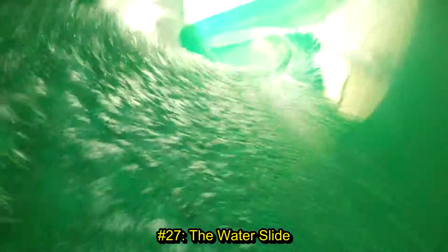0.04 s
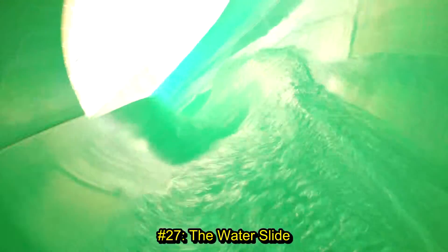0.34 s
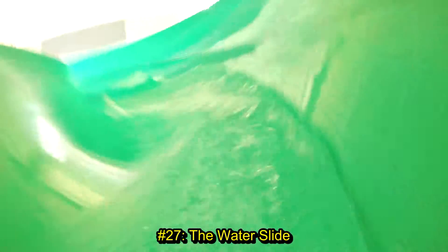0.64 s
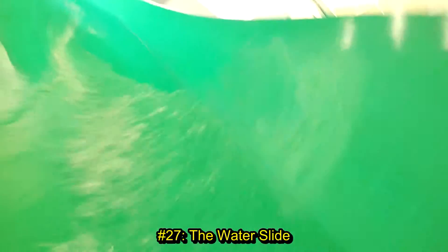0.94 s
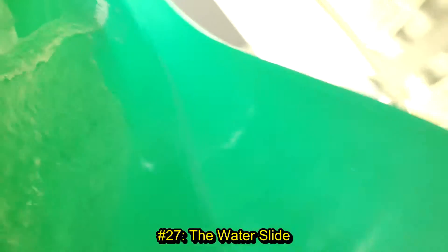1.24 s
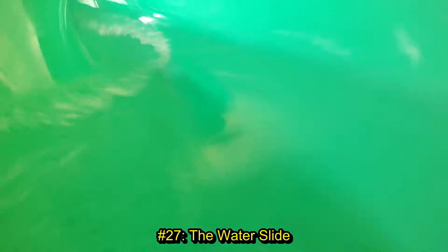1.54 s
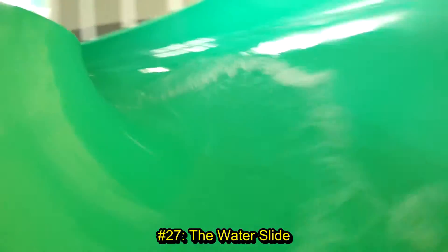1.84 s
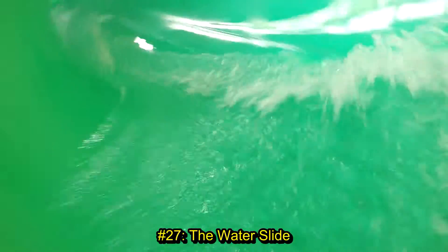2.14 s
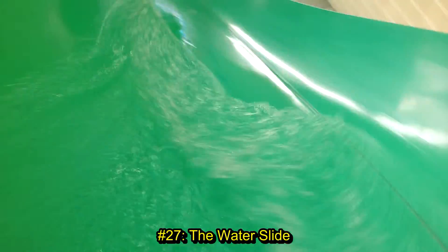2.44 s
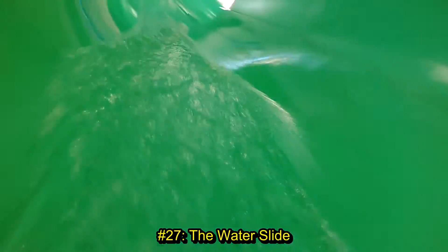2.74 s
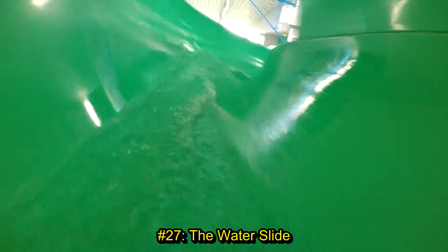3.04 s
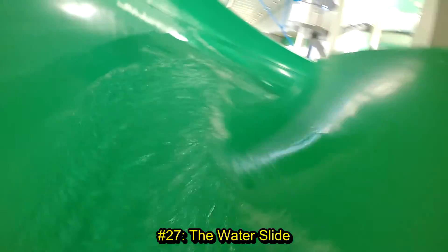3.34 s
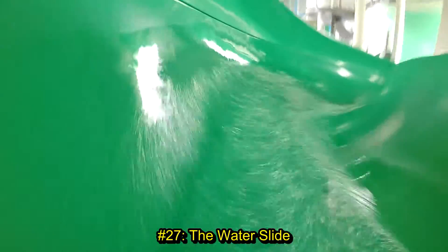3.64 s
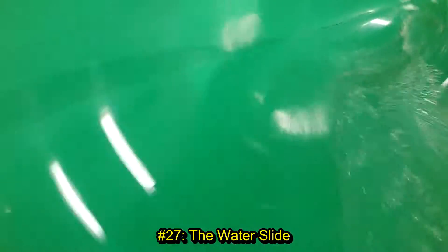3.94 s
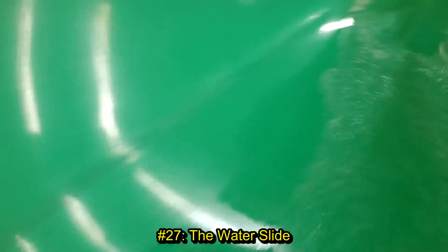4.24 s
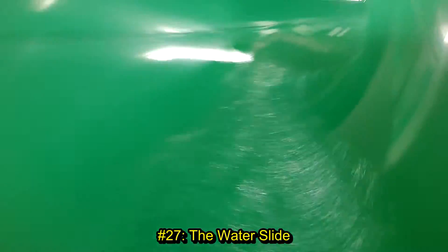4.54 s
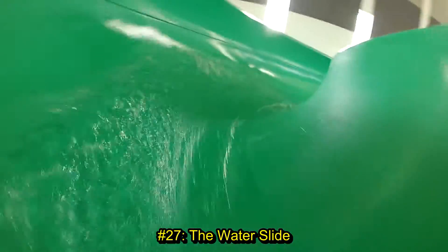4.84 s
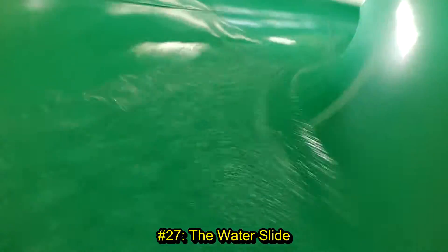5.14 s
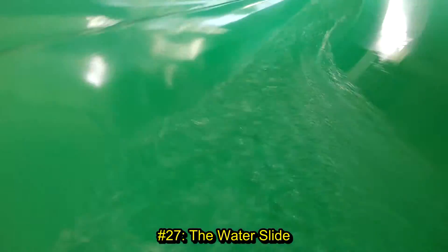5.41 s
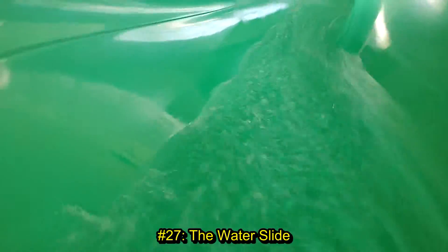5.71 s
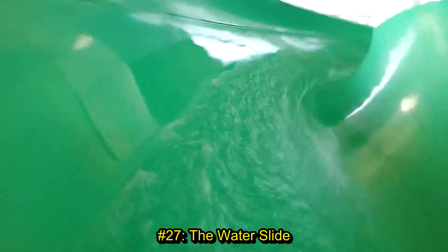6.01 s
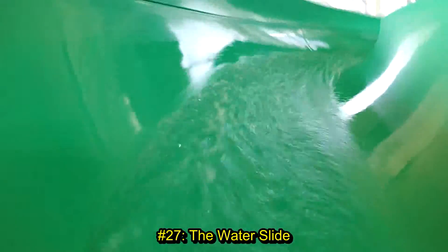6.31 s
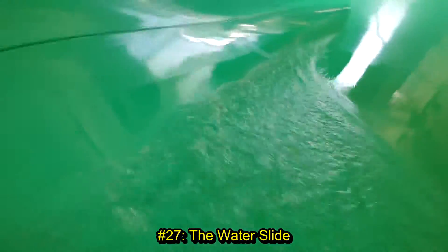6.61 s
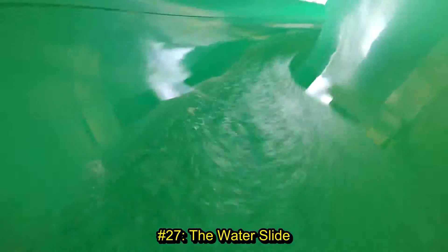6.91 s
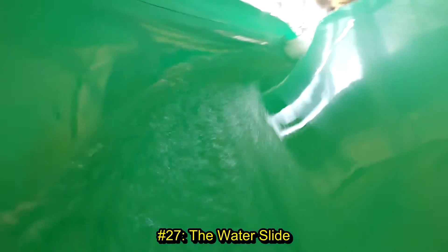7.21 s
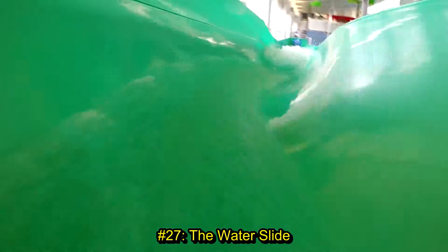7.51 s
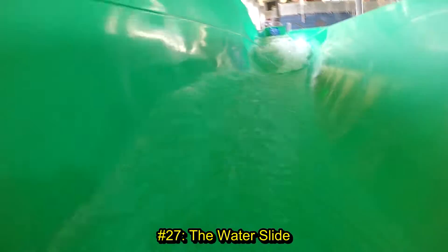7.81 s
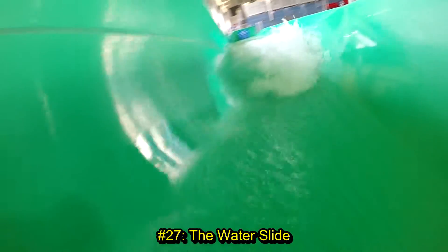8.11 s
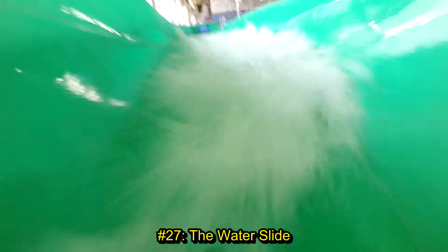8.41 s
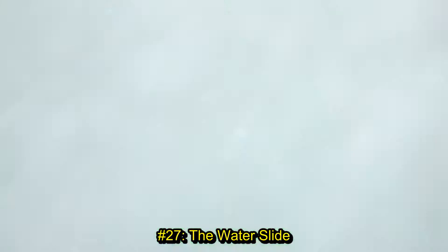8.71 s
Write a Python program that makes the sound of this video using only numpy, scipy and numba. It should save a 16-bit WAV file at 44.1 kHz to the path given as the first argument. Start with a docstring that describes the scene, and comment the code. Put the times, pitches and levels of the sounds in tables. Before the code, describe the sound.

Water rushes and bubbles along a hollow plastic water slide, heard from a camera riding just above the stream. It starts loud, then settles lower, with surges of spray, ticking drops and small plops. Gusts of air rumble on the microphone and dull thumps mark the joints in the slide. Near the end a deep roar builds, and a wave breaks over the microphone with sizzling foam, hard slaps and booms.

```python
"""A ride down a plastic water slide, heard from a camera held just above the running water.
From the top, bubbles ring in the curved flume over a low roar, and air buffets the microphone.
On the way down the rider thumps over joints, surges throw spray and drops at the camera, and big
bubbles plop. Then the run-out roars closer, until its wave breaks over the microphone
in sizzling foam, hard slaps and deep booms."""
import sys
import numpy as np
from scipy import signal
from scipy.fft import rfft, irfft
from scipy.io import wavfile
from scipy.ndimage import uniform_filter1d
from numba import njit

SR = 44100
rng = np.random.default_rng(int(sys.argv[2]) if len(sys.argv) > 2 else 0)


def wav_out(sig):
    """Save sig, one row per channel (or a flat mono array), as 16-bit PCM at SR to the path in sys.argv[1]."""
    wavfile.write(sys.argv[1], SR, np.round(np.clip(np.atleast_2d(sig).T, -1, 1) * 32767).astype(np.int16))


N = 386316
TIME = np.arange(N) / SR

# the stream's fader, loud at the top, thin lower down, swelling at the run-out: (time [s], level [dB])
STREAM_LEVEL = [(0, -34), (.52, -35), (1.15, -41.5), (2.9, -42), (3.15, -45), (3.6, -42.5), (4.6, -44),
                (5.1, -43), (5.65, -47.5), (6.1, -47), (6.85, -45.5), (7.5, -40), (8.2, -40), (8.44, -35),
                (8.52, -28.5)]
# EQ of the upper bends, the lower bend and the run-out: (frequency [Hz], gain [dB])
UPPER_EQ = [(200, -8), (400, -4.5), (600, -2.5), (850, -2), (980, -7), (1200, -3.5), (1500, -11.5),
            (1750, -4.5), (2280, -10.5), (2800, -5.5), (3600, -10.5), (4800, -10), (8800, -27),
            (15000, -35)]
LOWER_EQ = [(200, -5), (390, -2), (600, 0), (850, -4.5), (1250, -6), (1500, -8), (1800, -3), (2320, -9),
            (2750, -4), (3700, -9.5), (5000, -9), (7400, -24.5), (11000, -28), (15000, -34)]
RUNOUT_EQ = [(200, -15), (370, -7.5), (700, -5.5), (970, -7.5), (1300, -2.5), (1500, -6), (1700, -3.5),
             (2200, -8), (2900, -4), (3600, -8), (4600, -7), (6500, -16.5), (8500, -26), (15000, -31.5)]
# the hollow between water, wall and camera in each stretch: (centre [Hz], width [Hz], strength [dB])
UPPER_RESONANCES = [(1340, 124, 4.5), (1823, 630, -1), (2550, 123, 5), (3017, 380, -1), (7750, 440, -14)]
LOWER_RESONANCES = [(1316, 146, 6), (1680, 300, -4.5), (2610, 200, -0.5), (3000, 280, 0), (6500, 390, -8)]
RUNOUT_RESONANCES = [(607, 450, -0.5), (1330, 180, 4), (1690, 124, 6), (2910, 570, 1), (9500, 600, -9)]
# ring of the camera case: (centre [Hz], width [Hz], strength [dB])
CASE_RESONANCES = [(4350, 540, -1.5), (6460, 370, -10), (7870, 360, -16), (9400, 600, -11)]
# water piling up against a wall and throwing spray: (time [s], lift [dB], length [s], extra spray [dB])
WALL_SURGES = [(.93, 3.5, 0.29, 3.5), (1.353, 3, 0.18, 1), (1.94, 2.5, 0.3, 2), (2.38, 2, 0.076, 4),
               (2.68, 2, 0.13, 3.5), (2.953, 2, 0.14, 2.5), (3.397, 1.4, 0.28, 1.5), (3.78, 2, 0.18, 3.5),
               (3.956, 4, 0.24, 1.5), (4.177, 1.5, 0.08, 3.5), (4.46, 1.1, 0.16, 1.5),
               (4.812, 2.5, 0.17, 3), (5.484, 3.5, 0.12, 0.5), (5.87, 3.5, 0.41, 1.5), (6.35, 2.5, 0.23, 1),
               (7.247, 3, 0.19, 1.5)]
# EQ of the air on the microphone: (frequency [Hz], gain [dB])
AIR_EQ = [(12, -29), (27, -1.5), (42, 3), (62, -3), (85, -12), (115, -21.5), (170, -39), (500, -63)]
# gusts as the camera swings through the bends and into the wave: (time [s], lift [dB], length [s])
AIR_GUSTS = [(0.79, 12.5, 0.38), (1.643, 8.5, 0.26), (2.295, 8.5, 0.35), (2.626, 6, 0.27), (3.7, 5.5, .4),
             (4.647, 6.5, 0.37), (5.3, 5, 0.52), (5.9, 6, .14), (6.418, 8, .15), (8.38, 8.5, 0.46),
             (8.704, 18, 0.13)]
# fader of the run-out's deep roar: (time [s], level [dB])
ROAR_LEVEL = [(0, -50.5), (1.2, -54.5), (4, -53), (7.2, -55.5), (7.85, -48), (8.05, -42), (8.3, -48),
              (8.5, -47.5), (8.76, -40)]
# EQ of the fine droplets: (frequency [Hz], gain [dB])
DROPLET_EQ = [(1500, -33), (3500, -13), (5200, -5), (6500, 3), (7900, -0.5), (9000, -12), (12000, -9),
              (15000, -13)]
# thumps over the flume's joints: (time [s], level [dB], pitch [Hz])
JOINT_THUMPS = [(.148, -29, 59.4), (0.779, -32, 51.3), (.87, -25, 55), (1.695, -26, 37.6),
                (2.121, -23, 57.6), (2.702, -25, 49.3), (3.21, -23, 48), (3.53, -28.5, 54.7),
                (4.545, -22.5, 39.7), (5.147, -22.5, 43.2), (5.811, -23.5, 56), (7.331, -23.5, 54),
                (8.356, -23.5, 48.3)]
# drops hitting the camera: (time [s], relative level [dB], ring [Hz])
DROP_HITS = [(.713, -29, 6400), (0.858, -31, 7800), (.979, -28, 4520), (1.363, -29, 3800),
             (1.829, -25.5, 4100), (1.904, -26.5, 4150), (2.011, -23.5, 4470), (2.239, -31, 4400),
             (2.668, -31, 5450), (2.719, -29, 8140), (2.996, -32, 6350), (3.05, -39, 8000),
             (3.3, -31, 4500), (4.071, -30.5, 4400), (4.104, -30, 6300), (4.591, -25, 3290),
             (4.77, -24.5, 6480), (5.116, -30, 3300), (5.304, -34, 5800), (5.488, -42, 7900),
             (5.752, -42, 7850), (6.115, -36, 9500), (6.297, -33, 6300), (6.489, -30, 5070),
             (7.31, -30, 4450), (8.455, -19, 4500), (8.501, -15.5, 4600)]
# EQ of a drop's splat: (frequency [Hz], gain [dB])
SPLAT_EQ = [(1200, -33), (2700, -1), (4500, 7.5), (8000, -11), (12000, -20), (15500, -17)]
# single large bubbles: (time [s], relative level [dB], starting pitch [Hz])
BUBBLE_PLOPS = [(.872, -27, 1230), (1.0, -34.5, 380), (1.046, -29.5, 633), (1.358, -26, 3150),
                (1.542, -26, 1770), (2.393, -23, 2550), (2.53, -32, 1310), (3.886, -27, 1290),
                (3.967, -23, 2920), (4.141, -29.5, 1180), (4.798, -29.5, 1220), (4.855, -28.5, 2990),
                (4.863, -36, 890), (5.419, -31.5, 1270), (5.482, -33, 2990), (5.749, -34, 2900),
                (6.874, -33, 2730), (7.135, -35, 587), (7.253, -34.5, 390), (7.296, -27, 2870)]
# EQ of the breaking wave: (frequency [Hz], gain [dB])
WAVE_EQ = [(40, -7), (100, 15.5), (210, -1.5), (340, 1), (560, 1), (1200, -1.5), (1700, 3.5), (2400, 0.5),
           (3200, 1), (4500, -2.5), (5800, -8), (7500, -14), (13000, -25), (15500, -30)]
# lumps of water: (time [s], relative crack level [dB], ring [Hz], decay [s], relative thud level [dB])
WAVE_SLAPS = [(8.533, -28, 3150, 0.0034, -34), (8.559, -5.5, 2360, .0022, -17),
              (8.574, -13, 4340, 0.0024, -30), (8.585, -16, 2960, 0.0016, -15),
              (8.5969, -7.5, 4660, 0.0014, -27), (8.6, -11.5, 2920, 0.0032, -16),
              (8.605, -13.5, 4280, 0.0023, -18), (8.612, -18, 3500, 0.003, -8.5),
              (8.6148, -16, 1720, 0.0019, -8), (8.6384, 0.5, 4020, 0.0018, -22),
              (8.6505, -29, 4500, 0.0018, -39), (8.6584, -13, 2040, 0.0026, -13),
              (8.664, -4, 1810, 0.002, -19), (8.67, -13.5, 3200, 0.0032, -26),
              (8.68, -25, 3580, 0.0047, -12), (8.7077, -5, 3160, 0.003, -11.5),
              (8.749, -17, 2240, 0.0036, -32)]
# heavy masses of the wave: (time [s], boom level [dB], pitch [Hz], foam level [dB], foam length [s])
WAVE_MASSES = [(8.544, -25, 70.4, -29.5, 0.066), (8.615, -18.5, 89, -22.5, 0.017),
               (8.639, -25, 85, -45, .01), (8.68, -15.5, 96, -22.5, 0.033),
               (8.716, -12.5, 72, -21.5, 0.041)]

LOWER_BEND_S, RUNOUT_S = (4.6, 5.6), (7.04, 7.6)  # crossfades into each stretch: from, to


def undb(db):
    """Decibels to gain."""
    return 10 ** (np.asarray(db) / 20)


def unit(x):
    """Scale to rms 1."""
    return x / np.sqrt(np.mean(x ** 2))


def fader(table):
    """Straight ramps between (time, level) points."""
    return np.interp(TIME, *np.transpose(table))


def swell(s, length, skew=0.18):
    """A hump of height 1 at time s, `length` wide at half height, rising faster than it falls."""
    age = (TIME - s) / length
    leaning = age / (1 + skew * np.sign(age))
    return np.exp(-np.minimum(np.log(16) * leaning ** 2, 20))


def wobble(rate):
    """Smooth random modulation of rms 1, changing `rate` times a second."""
    size = int(SR / rate)
    steps = np.repeat(rng.standard_normal(N // size + 1), size)
    return unit(uniform_filter1d(steps, size)[:N])


def add(out, s, sound):
    """Mix a sound in from time s."""
    start = max(int(s * SR), 0)
    part = out[start:start + len(sound)]
    part += sound[:len(part)]


def band(x, lo_hz, hi_hz, order=3):
    """Band-pass."""
    return signal.sosfilt(signal.butter(order, [lo_hz, hi_hz], "band", fs=SR, output="sos"), x)


def equalise(x, points, resonances=()):
    """Minimum-phase EQ: a smooth curve with resonant peaks standing on it."""
    size = 2048
    f = np.maximum(np.fft.rfftfreq(size, 1 / SR), 1)
    hz, db = np.transpose(points)
    curve = undb(np.interp(np.log(f), np.log(hz), db))
    peaks = 1 + sum(undb(d) / (1 + (2 * (f - centre) / width) ** 2) for centre, width, d in resonances)
    cepstrum = irfft(np.log(curve * peaks))
    cepstrum[1:size // 2] *= 2  # folded forward, so the ring follows the hit
    cepstrum[size // 2 + 1:] = 0
    return signal.fftconvolve(x, irfft(np.exp(rfft(cepstrum))))[:len(x)]


@njit
def chirps(starts, hz, cycles, gains, glide):
    """Ringing bubbles: sines with a quick attack that die away while their pitch rises."""
    out = np.zeros(N)
    for k in range(len(starts)):
        start, length, phase = int(starts[k]), cycles[k] * SR / hz[k], 0.
        for i in range(min(int(length), N - start)):
            age = i / length
            out[start + i] += gains[k] * min(age / .07, 1.) * np.exp(-5.5 * age) * np.sin(phase)
            phase += 2 * np.pi * hz[k] * (1 + glide * age) / SR
    return out


def bubbles(rate, lo_hz, hi_hz, cycles, spread_db, glide):
    """A swarm of bubbles: many weak, a few strong, with even power per Hz."""
    when, pitch, life, luck = rng.random((int(rate * N / SR), 4)).T
    hz = lo_hz * (hi_hz / lo_hz) ** pitch
    strength = np.minimum(-np.log(1 - luck), 5.5)
    return unit(chirps(when * N, hz, cycles * (.5 + life), hz * undb(spread_db * strength), glide))


def spatter(rate, spread_db, decay_s):
    """Small splats at random moments, each a tiny burst of noise."""
    chance, luck = rng.random((2, N))
    strength = np.minimum(-np.log(1 - luck), np.pi)
    hits = (chance < rate / SR) * undb(spread_db * strength)
    t = TIME[:SR // 40]
    envelope = signal.fftconvolve(hits, t * np.exp(-t / decay_s))[:N]
    return unit(envelope * rng.standard_normal(N))


def flume(x):
    """The hollow flume colours the water, morphing from upper bends to lower bend to run-out."""
    descended = np.interp(TIME, LOWER_BEND_S, [0, 1])
    opened = np.interp(TIME, RUNOUT_S, [0, 1])
    upper = unit(equalise(x, UPPER_EQ, UPPER_RESONANCES + CASE_RESONANCES))
    lower = unit(equalise(x, LOWER_EQ, LOWER_RESONANCES + CASE_RESONANCES))
    runout = unit(equalise(x, RUNOUT_EQ, RUNOUT_RESONANCES + CASE_RESONANCES))
    return (1 - descended) * upper + (descended - opened) * lower + opened * runout


def thrown_spray_db():
    """The extra spray that surges throw off the wall."""
    return sum(extra_db * swell(s, length) for s, _, length, extra_db in WALL_SURGES)


def stream_levels():
    """Faders in dB: surges lift the rush and the spray, and the churn follows more gently."""
    surge_db = sum(lift_db * swell(s, length) for s, lift_db, length, _ in WALL_SURGES)
    rush_db = fader(STREAM_LEVEL) + surge_db
    spray_db = rush_db - 9.5 + thrown_spray_db()
    depth_db = np.interp(TIME, RUNOUT_S, [0, 4])  # the deeper run-out churns more
    churn_db = -49.5 + 0.74 * (rush_db + 41) + depth_db
    return churn_db, rush_db, spray_db


def running_water():
    """The bed: large bubbles churn, small ones rush and bursting spray crackles, each over a wash."""
    churn_db, rush_db, spray_db = stream_levels()
    slosh = wobble(rate=28)  # wavelets breaking, felt in every band at once
    splats = spatter(rate=130, spread_db=2, decay_s=0.0011)
    churn = rng.standard_normal(N)
    churn += undb(-10) * bubbles(700, 243.4, 1300, cycles=14.6, spread_db=1.4, glide=0.23)
    rush = rng.standard_normal(N) + undb(-13) * splats
    rush += undb(-5.5) * bubbles(3500, 870, 5170, cycles=16.2, spread_db=2, glide=0.14)
    spray = rng.standard_normal(N) + undb(-5.5) * splats
    spray += undb(-5) * bubbles(3000, 3090, 15300, cycles=17.5, spread_db=2, glide=0.05)
    churn = unit(band(flume(churn), 218, 1026)) * undb(churn_db + 0.27 * slosh)
    rush = unit(band(flume(rush), 957, 3860, order=4)) * undb(rush_db + 0.66 * slosh)
    spray = unit(band(flume(spray), 4180, 14000, order=4)) * undb(spray_db + 0.61 * slosh)
    submerged = np.interp(TIME, [8.54, 8.6], [1, .3])  # the bed ducks under the wave
    return (churn + rush + spray) * submerged


def air_buffeting(start_db=-42, fall_db_per_s=0.56):
    """Air rumbles on the microphone: a slowly easing draught with gusts on top."""
    air = unit(equalise(rng.standard_normal(N), AIR_EQ))
    gust_db = sum(lift_db * swell(s, length) for s, lift_db, length in AIR_GUSTS)
    return air * undb(start_db - fall_db_per_s * TIME + gust_db)


def runout_roar():
    """Heavy water roars ahead in the run-out: low noise and big, deep bubbles."""
    water = rng.standard_normal(N)
    water += undb(-2) * bubbles(220, 106, 340, cycles=7.2, spread_db=2, glide=0.25)
    return unit(band(water, 106, 294, order=2)) * undb(fader(ROAR_LEVEL))


def droplets():
    """Fine droplets tick and ping on the case, in showers wherever a surge throws spray."""
    per_s = 22 + 63 * thrown_spray_db()
    ticks = spatter(per_s, spread_db=3.2, decay_s=0.0011)
    pings = bubbles(160, 4990, 12000, cycles=70, spread_db=2.5, glide=0.02)
    pings = unit(pings * np.sqrt(per_s))  # louder as the shower thickens
    shower = unit(equalise(ticks + undb(-2) * pings, DROPLET_EQ, CASE_RESONANCES))
    return shower * undb(fader(STREAM_LEVEL) - 19.5)


def thumps(hits, knock_db=-19.5, lead_s=0.1):
    """A joint or a mass of water heaves the camera: a deep thump with a shorter knock an octave up."""
    out = np.zeros(N)
    t = TIME[:int(2 * lead_s * SR)] - lead_s
    for s, db, hz in hits:
        heave, knock = (np.cos(2 * np.pi * f * t) / np.cosh(t * f / 0.48) for f in (hz, 2 * hz))
        add(out, s - lead_s, -undb(db) * (heave + undb(knock_db) * knock))
    return out


def drops(trim_db=-2):
    """Each drop is a tiny splat on the camera case with a short ring."""
    out, t = np.zeros(N), TIME[:SR // 30]
    for s, db, hz in DROP_HITS:
        noise = unit(equalise(rng.standard_normal(len(t)), SPLAT_EQ, CASE_RESONANCES))
        splat = noise * np.exp(-t / 0.003)
        ping = np.sin(2 * np.pi * hz * t) * np.exp(-t / 0.0029)
        tick = (splat + .8 * ping) * (1 - np.exp(-t / 0.00093))
        add(out, s, undb(db + trim_db) * tick / np.abs(tick).max())
    return out


def plops():
    """A pocket of air closes, rings and rises in pitch as it nears the surface."""
    s, db, hz = np.transpose(BUBBLE_PLOPS)
    cycles = 1.2 * np.sqrt(hz)  # small bubbles ring for more cycles
    return chirps(s * SR, hz, cycles, undb(db), glide=0.12)


def foam(break_s=8.44, hold_db=-35, rise_db_per_s=47):
    """Sizzling foam builds until the wave breaks, then holds; each mass of water adds a gush."""
    sizzle = rng.standard_normal(N)
    sizzle += undb(6) * bubbles(5000, 321, 13600, cycles=7.7, spread_db=3, glide=0.11)
    sizzle += spatter(rate=260, spread_db=1, decay_s=0.00028)
    build = undb(hold_db - rise_db_per_s * np.maximum(break_s - TIME, 0))
    gushes = sum(undb(db) * swell(s, length) for s, _, _, db, length in WAVE_MASSES)
    return unit(equalise(sizzle, WAVE_EQ)) * (build + gushes)


def slaps(crack_trim_db=4.5, thud_trim_db=-0.5):
    """Lumps of water slap the camera, ring with trapped air and thud on its body."""
    out, t = np.zeros(N), TIME[:SR // 10]
    for s, crack_db, hz, decay_s, thud_db in WAVE_SLAPS:
        burst, flutter, push = rng.standard_normal((3, len(t)))
        # the air pocket is squeezed as it rings, so its pitch wanders
        pocket_hz = hz * (1 + 0.11 * unit(band(flutter, 100, 1100, order=1)))
        pocket = np.sin(2 * np.pi * np.cumsum(pocket_hz) / SR)
        envelope = (1 - np.exp(-(t / 0.00082) ** 2)) * np.exp(-t / decay_s)
        crack = (unit(equalise(burst, WAVE_EQ)) + pocket) * envelope
        thud = unit(band(push, 170, 420, order=2)) * (1 - np.exp(-t / 0.0008)) * np.exp(-t / 0.0049)
        add(out, s, undb(crack_db + crack_trim_db) * crack + undb(thud_db + thud_trim_db) * thud)
    return out


def booms():
    """The wave's heavy masses land on the camera."""
    return thumps([row[:3] for row in WAVE_MASSES])


def scene():
    """The whole ride, in mono."""
    water = running_water() + plops() + drops() + droplets()
    low_end = air_buffeting() + runout_roar() + thumps(JOINT_THUMPS)
    wave = foam() + slaps() + booms()
    return (water + low_end + wave)[None]


def record(dry, ceiling=1.1, top_hz=15150):
    """The hardest slaps overload the microphone; a steep low-pass cuts the top."""
    low_pass = signal.ellip(12, .2, 80, top_hz, fs=SR, output="sos")
    return signal.sosfilt(low_pass, ceiling * np.tanh(dry / ceiling))


dry = scene()
out = record(dry)
wav_out(out)
```